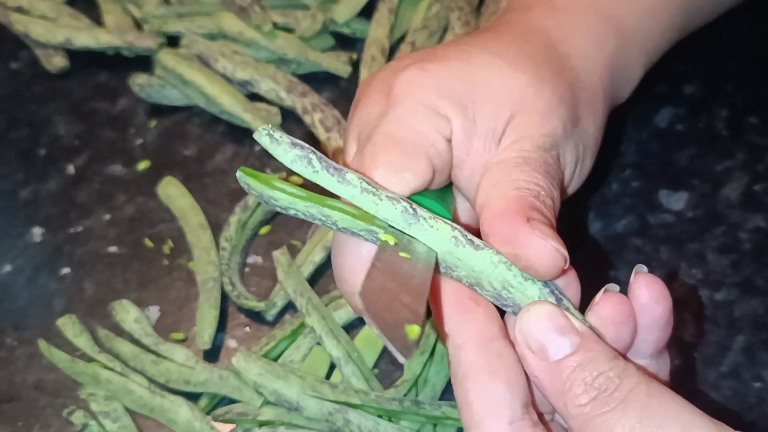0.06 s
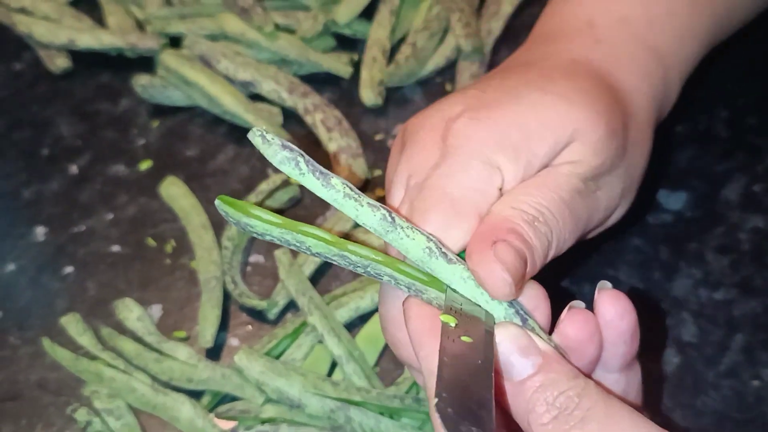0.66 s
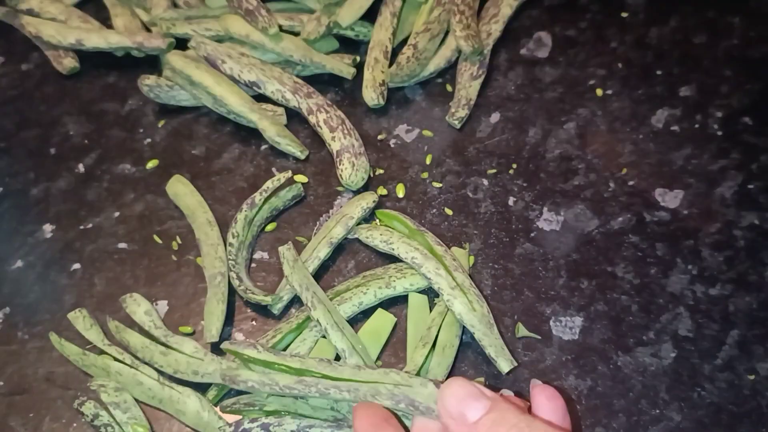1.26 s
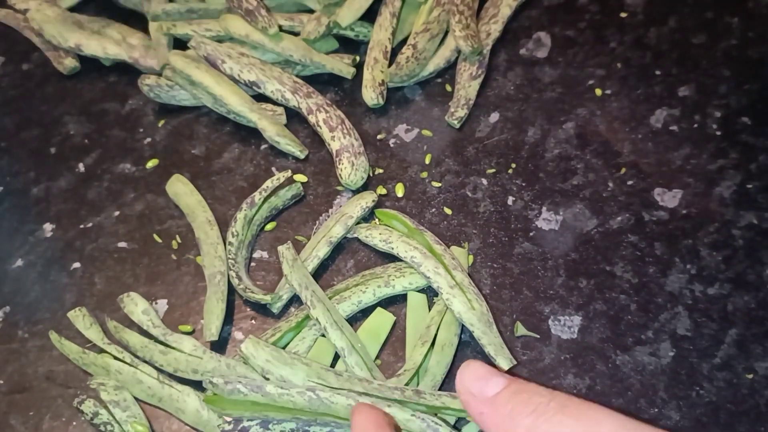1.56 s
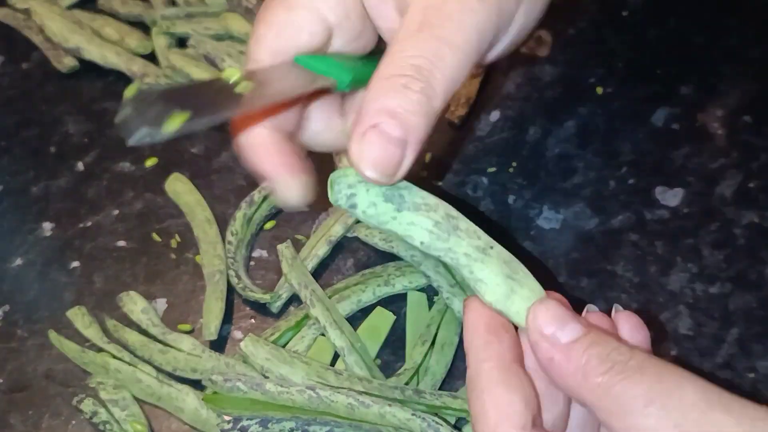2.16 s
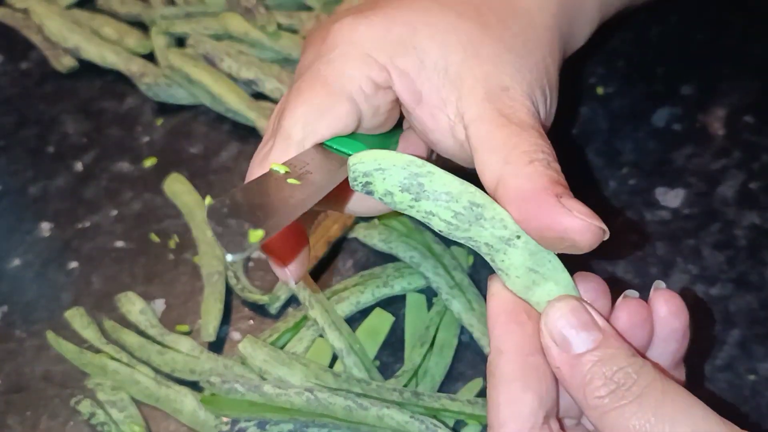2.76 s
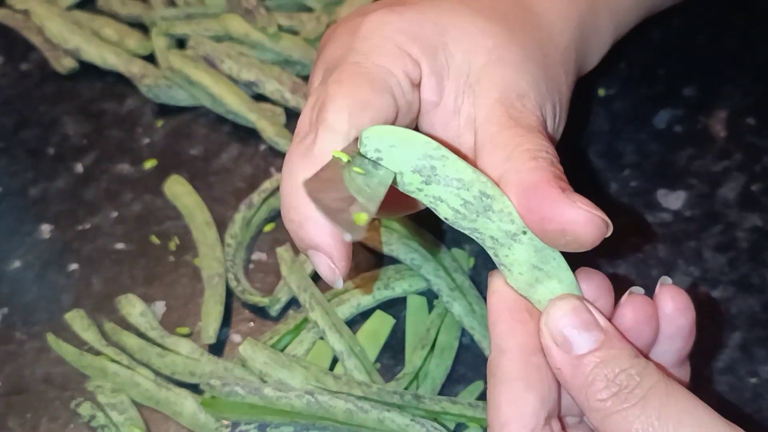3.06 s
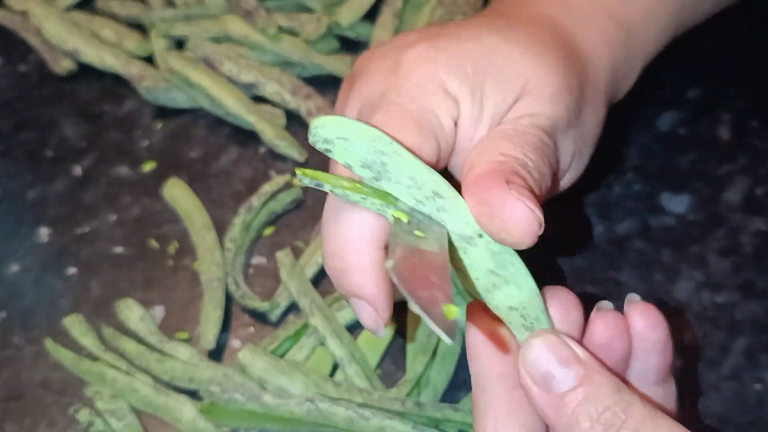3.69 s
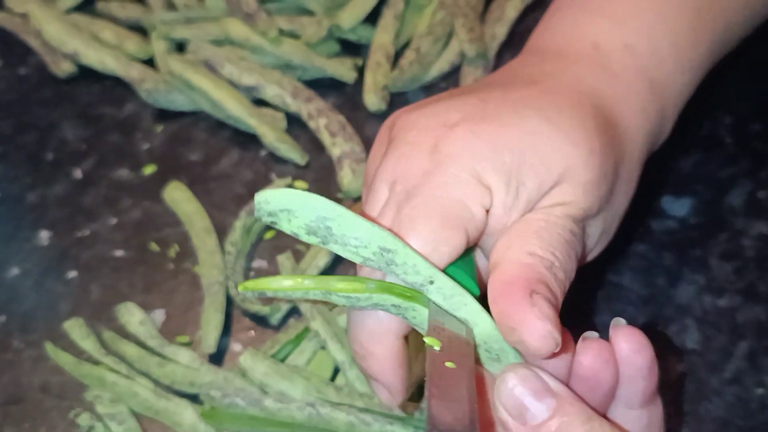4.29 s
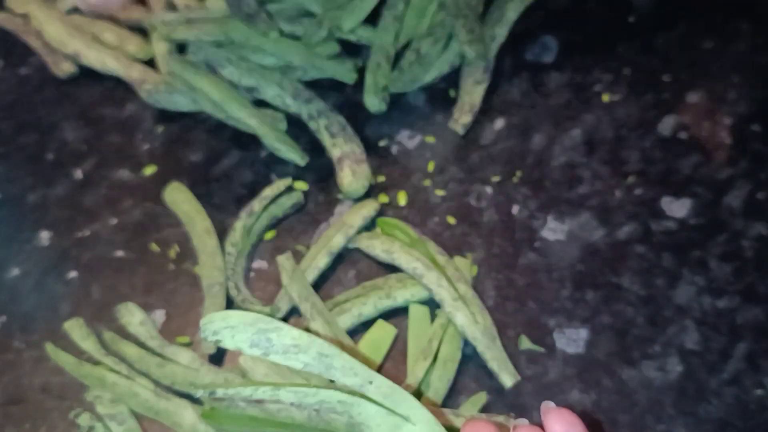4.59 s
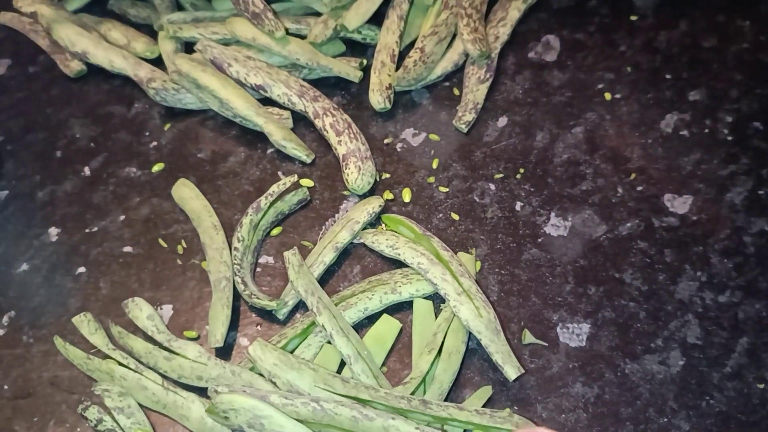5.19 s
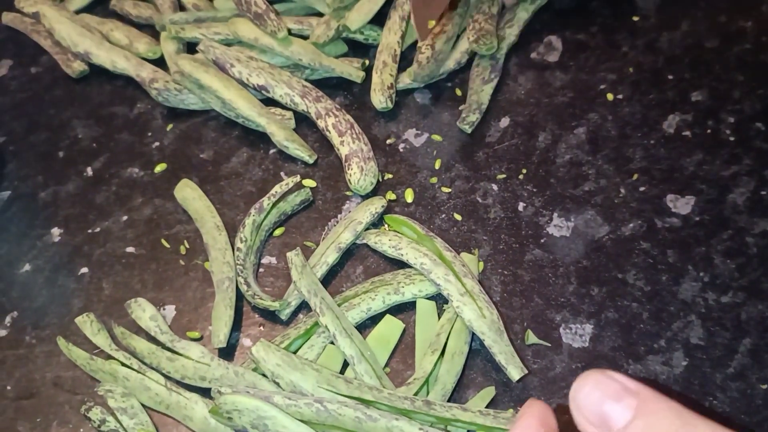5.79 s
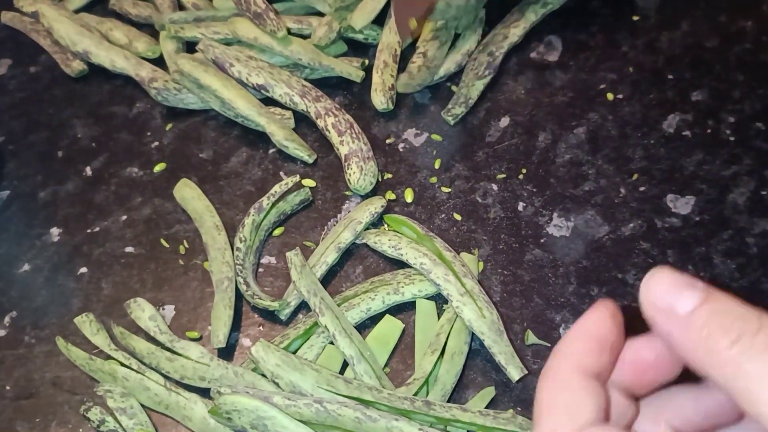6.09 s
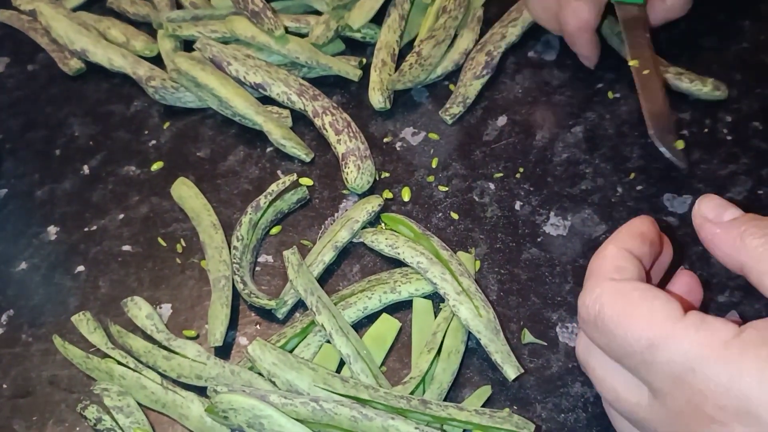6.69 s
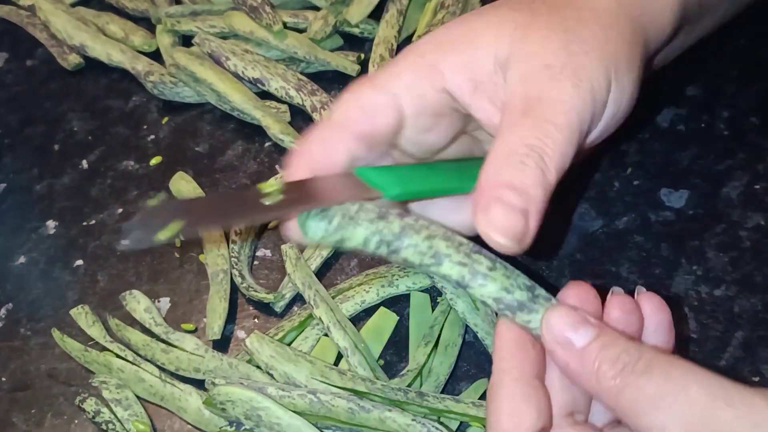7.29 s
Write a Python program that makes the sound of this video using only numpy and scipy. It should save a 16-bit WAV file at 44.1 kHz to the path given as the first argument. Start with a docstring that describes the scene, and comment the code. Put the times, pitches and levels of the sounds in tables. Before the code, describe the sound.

Close, crisp scraping and tiny snaps of a blade splitting bean pods, with faint finger rustling and dull knocks on a kitchen counter.

```python
"""Crisp rasps and snaps: a small knife slits two bean pods lengthwise, close to a phone over a stone counter.
The blade breaks a dense run of tiny fibres; tougher strings snap singly. Between cuts, fingers rustle
over the skins, and pods are shoved, laid down, dropped and picked up with dull knocks.
A quiet kitchen answers with short echoes over a low murmur and thin hiss."""
import sys
import numpy as np
from scipy import signal
from scipy.fft import rfft, irfft
from scipy.io import wavfile
from scipy.ndimage import uniform_filter1d

SR = 44100
rng = np.random.default_rng(int(sys.argv[2]) if len(sys.argv) > 2 else 0)


def bounce(signal):
    """Save signal as a 16-bit WAV file at the path given by the first command-line argument."""
    frames = np.transpose(np.atleast_2d(signal))
    limited = np.clip(frames, -1, 1)
    pcm = np.round(limited * 32767).astype(np.int16)
    wavfile.write(sys.argv[1], SR, pcm)


N = 328545
T = np.arange(N) / SR
TREBLE_HZ = 7800  # rasp below, fizz above


def undb(db):
    """Decibels to gain."""
    return 10 ** (np.asarray(db) / 20)


def unit(x):
    """Scale to rms 1."""
    return x / np.sqrt(np.mean(x ** 2))


def burst(x):
    """Scale the loudest 5 ms to rms 1."""
    return x / np.sqrt(uniform_filter1d(x ** 2, size=220).max())


def decay(t, t60_s):
    """Exponential fall, 60 dB in t60_s."""
    return np.exp(-np.log(1000) * t / t60_s)


def rise(t, rise_s):
    """Exponential onset towards 1."""
    return 1 - np.exp(-t / rise_s)


def butter(order, hz, kind):
    """Butterworth filter sections."""
    return signal.butter(order, hz, kind, fs=SR, output="sos")


def band(x, lo_hz, hi_hz=SR / 2 - 1):
    """Steep band-pass."""
    return signal.sosfilt(butter(4, [lo_hz, hi_hz], "band"), x)


def convolve(x, response):
    """Apply a response, keeping the length."""
    return signal.oaconvolve(np.atleast_2d(x), np.atleast_2d(response), axes=-1)[:, :x.shape[-1]]


def colour(x, points, power=1, size=4096):
    """Minimum-phase filter through (freq_hz, gain_db) points."""
    hz, db = np.transpose(points)
    log_hz = np.log(np.fft.rfftfreq(size, 1 / SR) + 1)
    gain = undb(power * np.interp(log_hz, np.log(hz), db))
    cepstrum = irfft(np.log(gain))[:size // 2]
    cepstrum[1:] *= 2
    response = irfft(np.exp(rfft(cepstrum, size)))[:size // 2]
    return convolve(x, response).reshape(x.shape)


def resonate(x, hz, cycles):
    """One resonance, falling 60 dB in the given cycles."""
    t = T[:SR // 20]
    return convolve(x, np.sin(2 * np.pi * hz * t) * decay(t, cycles / hz))


def add(track, start_s, sound):
    """Mix a sound in at start_s."""
    start = max(int(start_s * SR), 0)
    track[..., start:start + sound.shape[-1]] += sound[..., :N - start]


def flutter(rate_hz):
    """Smooth random wander, rms 1."""
    steps = rng.standard_normal(N // 40)
    return unit(np.interp(T * rate_hz, np.arange(len(steps)), steps))


def stroke(start_s, length_s, level_db, change_db, attack_s, release_s):
    """Gain of one hand movement: sets in, holds while the force drifts, dies away."""
    out, t = np.zeros(N), T[:int((length_s + 7 * release_s) * SR)]
    hold = undb(level_db + change_db * (np.minimum(t / length_s, 1) - .5))
    attack = np.minimum(t / attack_s, 1)
    release = np.exp(-np.maximum(t - length_s, 0) / release_s)
    add(out, start_s, hold * attack * release)
    return out


def impulses(rate_hz, spread_db, scatter):
    """Tiny random breaks or slips; spread_db makes a few strong, scatter varies them between ports."""
    size = undb(spread_db * np.minimum(rng.exponential(size=N), np.log(400)))
    occurs = rng.random(N) < rate_hz / SR
    return size * occurs * (rng.choice([-1, 1], N) + scatter * rng.standard_normal((2, N)))


def ports(pair, balance):
    """Two microphone ports, each with its own colour."""
    return np.array([colour(pair[0], balance, 1 / 2), colour(pair[1], balance, -1 / 2)])


def air(level_db=-63, waver_db=0.13, murmur_hz=900):
    """Low room murmur wavering under thin, steady hiss."""
    # still kitchen air: freq_hz, gain_db
    air_colour = [(15, -83), (25, -13.5), (113, 0.5), (179, -3.5), (211, -2), (333, -7), (425, -11.5),
                  (500, -11.5), (691, -15.5), (749, -17.5), (1590, -19), (1820, -18), (4100, -27),
                  (7630, -35.5), (10800, -36.5), (15800, -32.5)]
    # stereo width: freq_hz, side_over_mid_db
    width = [(60, -1.5), (110, -0.1), (200, -3), (380, -1.5), (700, -1), (1290, 0.7), (2380, -0.5),
             (4400, 0.52), (8120, -2.5), (15000, -25)]
    # air at the ports: freq_hz, left_over_right_db
    balance = [(60, 1.5), (110, 2.5), (200, 0), (380, 1.5), (700, 1), (1290, 0.5), (2380, -0.5),
               (4400, 0.5), (8120, -1), (15000, 2)]
    mid, side = colour(rng.standard_normal((2, N)), air_colour)
    side = colour(side, width)
    pair = ports(np.array([mid + side, mid - side]) / np.std(mid), balance)
    murmur = signal.sosfiltfilt(butter(2, murmur_hz, "low"), pair)
    waver = undb(waver_db * flutter(rate_hz=4))
    return (pair + murmur * (waver - 1)) * undb(level_db)


def kitchen(x, wet_db, echo_db, t60_s=0.3, build_s=0.0013):
    """Add near reflections and a short diffuse tail, its bass alike at both ports."""
    # nearby surfaces: delay_s, relative_db
    echoes = [(.0088, -26.5), (0.0153, -8.5), (.027, -24)]
    # diffuse tail: freq_hz, gain_db
    room_colour = [(60, -0.5), (250, -3.5), (700, -8.5), (1500, -3), (3000, -3.5), (6000, -9),
                   (15000, -11.5)]
    t = T[:SR // 2]
    mid, side = rng.standard_normal((2, len(t)))
    side = band(side, lo_hz=460)
    tail = colour(np.array([mid + side, mid - side]), room_colour) * decay(t, t60_s) * rise(t, build_s)
    response = undb(wet_db) * unit(tail) / np.sqrt(len(t))
    for delay_s, relative_db in echoes:
        response[:, int(delay_s * SR)] += undb(relative_db + echo_db)
    return x + convolve(x, response)


def fingers(judder_db=4, change_db=0.5):
    """Fingertips slide over the skins with a fine, faint rustle, brighter on some."""
    # slides: start_s, length_s, level_db, extra_treble_db
    rubs = [(0.59, 0.63, -73.5, -3), (1.2, 0.19, -64, 3), (1.452, 0.22, -64.5, 2.5),
            (1.688, 0.25, -78.5, 4), (2.098, 0.075, -69.5, 0), (2.48, 0.16, -76.5, -12),
            (4.348, 0.21, -70, -3), (4.824, 0.23, -66.5, 4), (5.292, 0.41, -73, 2), (5.762, 0.079, -64, 0),
            (5.885, 0.29, -68.5, 0), (6.1, 0.045, -64.5, 4), (6.267, 0.11, -71.5, 2.5),
            (6.665, 0.076, -61, 3), (6.782, 0.1, -67, -6), (6.925, 0.35, -79.5, -5), (7.19, .22, -69, -2)]
    # rubbed skin: freq_hz, gain_db
    skin_colour = [(530, -22), (900, 7), (1140, -25), (2130, 4.5), (2620, 9), (4760, -3), (6660, -3.5),
                   (11200, -9.5), (15100, -15), (15800, -12)]
    slips = impulses(rate_hz=5000, spread_db=0, scatter=0.91) * undb(judder_db * flutter(rate_hz=45))
    rustle = unit(colour(slips, skin_colour))
    treble = signal.sosfiltfilt(butter(2, TREBLE_HZ, "high"), rustle)
    out = np.zeros((2, N))
    for start_s, length_s, level_db, extra_treble_db in rubs:
        force = stroke(start_s, length_s, level_db, change_db, attack_s=0.0087, release_s=0.036)
        out += (rustle + treble * (undb(extra_treble_db) - 1)) * force
    return out


def shoves(judder_db=2):
    """A pushed pod sticks and slips on stone: a low, dull shuffle."""
    # pushes along the counter: start_s, length_s, level_db, change_db
    moves = [(1.597, 0.0423, -52.5, 21), (5.042, .035, -55, -12), (5.773, 0.036, -54, 4),
             (6.118, 0.092, -56.5, 4), (6.71, .045, -67, 3)]
    # pod sliding on stone: freq_hz, gain_db
    shove_colour = [(100, -32), (170, 7), (300, -1), (450, 1), (620, -12), (830, -3), (1100, -19.5),
                    (1600, -32), (3000, -33), (8000, -65)]
    slips = impulses(rate_hz=700, spread_db=3, scatter=0.16) * undb(judder_db * flutter(rate_hz=70))
    force = sum(stroke(*move, attack_s=0.004, release_s=0.0072) for move in moves)
    return unit(colour(slips, shove_colour)) * force


def modes(table, t, rise_s, freq_scale):
    """Decaying sines from a soft contact; a pod is too light to move the deep bass."""
    ring = sum(undb(db) * np.sin(2 * np.pi * freq * freq_scale * t) * decay(t, t60_s)
               for freq, t60_s, db in table)
    return burst(signal.sosfilt(butter(3, 90, "high"), ring * rise(t, rise_s)))


def blows(slap_t60_s=0.022, thud_lag_s=0.00082, detune=0.027):
    """Wet skin slaps, the pod knocks, the counter follows with a low thud."""
    # a blade jolt, then pods and knuckles on the counter: start_s, thud_db, knock_db, knock_hz, contact_s
    hits = [(0.2023, -70, -61.5, 1113, 0.00029), (1.48, -53, -56, 466, 0.0041),
            (1.551, -55, -59, 440, 0.0017), (1.623, -41, -47, 484, 0.0027), (1.634, -42, -51, 550, 0.00047),
            (4.857, -55.5, -58.5, 448, 0.0014), (5.043, -36.5, -58, 440, 0.00032),
            (5.326, -61, -63, 540, 0.004), (5.8, -43, -68, 477, 0.0013), (5.822, -45, -52, 440, 0.0019),
            (5.961, -60, -44, 680, 0.00051), (6.119, -52, -52.5, 473, .002),
            (6.2467, -21, -20, 687, 0.00066), (6.328, -33, -40, 546, 0.002),
            (6.383, -38.5, -49, 480, 0.0027), (6.669, -45.5, -50, 540, 0.0012),
            (6.689, -29.5, -35.5, 552, 0.00093), (6.744, -43, -41.5, 446, 0.0034),
            (6.834, -47.5, -38, 687, 0.00088), (6.88, -51, -45.5, 630, 0.0023),
            (7.319, -57.5, -52.5, 838, 0.00033)]
    # counter modes: freq_hz, t60_s, relative_db
    counter_modes = [(127, 0.087, -18.5), (182, 0.12, -15.5), (231, 0.13, -16.5), (269, 0.044, 4),
                     (270.7, 0.066, -26), (329, 0.038, -7)]
    # pod hitting stone: pitch_ratio, t60_s, relative_db
    pod_modes = [(.69, .04, 3), (.86, .03, -10.5), (1, .045, 11.5), (1.165, 0.023, 13.5), (1.35, 0.038, 2),
                 (1.56, 0.04, -24), (1.8, .014, -35)]
    # wet skin: freq_hz, gain_db
    slap_colour = [(600, -48), (1100, 9), (1600, 7), (2400, 3), (4000, -6.5), (6000, -18), (10000, -35),
                   (15000, -38)]
    usual_slap_db, usual_knock_db, usual_contact_s = -60.5, -48, .002
    out, t = np.zeros((2, N)), T[:SR // 3]
    loudest_db = max(hit[1] for hit in hits)
    for start_s, thud_db, knock_db, knock_hz, contact_s in hits:
        rise_s = max(contact_s, .0003)
        # hard, short contacts slap most
        softening_db = 4.6 * np.log2(rise_s / usual_contact_s)
        slap_db = usual_slap_db + 0.54 * (knock_db - usual_knock_db) - softening_db
        # light touches land on other pods and stray most in pitch
        stretch = 1 + detune * np.tanh((loudest_db - thud_db) / 15) * rng.standard_normal()
        slap = rng.standard_normal((2, len(t))) * decay(t, slap_t60_s) * rise(t, rise_s)
        add(out, start_s, undb(slap_db) * burst(colour(slap, slap_colour)))
        add(out, start_s, undb(knock_db) * modes(pod_modes, t, rise_s, knock_hz))
        add(out, start_s + thud_lag_s, undb(thud_db) * modes(counter_modes, t, 2 * rise_s, stretch))
    return out


def scrape(pushes, body, rate_hz, spread_db, ring_hz, ring_db):
    """Fibres break in uneven spurts and ring the pod; the finest fizz above the rasp."""
    judder_db, attack_s, release_s = 1.05, 0.003, 0.011
    breaks = impulses(rate_hz, spread_db, scatter=0.72) * undb(judder_db * flutter(rate_hz=160))
    crackle = colour(breaks, body)
    ring = undb(ring_db) * unit(resonate(breaks, ring_hz, cycles=30))
    dry_rasp = unit(band(crackle, lo_hz=2160, hi_hz=TREBLE_HZ))  # fibres are too small to sound lower
    rasp = unit(dry_rasp + ring)
    fizz = unit(band(crackle, lo_hz=TREBLE_HZ))
    out = np.zeros((2, N))
    for start_s, length_s, rasp_db, change_db, fizz_db in pushes:
        out += rasp * stroke(start_s, length_s, rasp_db, change_db, attack_s, release_s)
        out += fizz * stroke(start_s, length_s, fizz_db, change_db, attack_s, release_s)
    return out


def skid():
    """A pod skids on the pile with one brief rasp."""
    # the slip: start_s, length_s, rasp_db, change_db, fizz_db
    slip = [(5.263, 0.02, -48, -7.5, -57)]
    # pod on pod: freq_hz, gain_db
    skid_colour = [(710, -32), (1200, -28), (2840, -3), (3070, 8.5), (3380, -10), (3610, -5.5),
                   (6740, -16.5), (9120, -20), (9940, -1), (13400, -37), (15800, -19)]
    return scrape(slip, skid_colour, rate_hz=6600, spread_db=4.5, ring_hz=3070, ring_db=-2.5)


def snaps(ring_cycles=22, overtone_ratio=1.523, overtone_db=-7, crumble_db=-5, sudden_s=0.0048,
          lowest_hz=2250):
    """A tough string lets go: a crack, crumbling flesh and a brief two-mode ring of the pod."""
    # string snaps and light blade ticks: start_s, level_db, ring_hz, crumble_s
    strings = [(0.0218, -41, 8200, 0.0092), (0.0303, -51, 5240, 0.014), (0.0458, -40.5, 4900, 0.0081),
               (0.065, -53, 4830, 0.0078), (0.1066, -42.5, 5000, 0.0086), (0.119, -43, 4500, .012),
               (0.1517, -43, 4100, .009), (0.18, -57, 3760, 0.016), (0.259, -50, 4430, 0.0077),
               (0.203, -39.5, 7000, 0.0059), (0.229, -44, 5050, 0.012), (0.322, -46, 4430, 0.012),
               (0.3343, -44.5, 4130, .007), (0.354, -43.5, 4100, 0.014), (0.393, -42, 5270, 0.0098),
               (0.4038, -46, 5040, 0.0052), (0.7302, -55.5, 2560, 0.0056), (0.9446, -54.5, 2860, 0.018),
               (1.1981, -52, 4160, 0.0055), (1.633, -51.5, 3060, 0.015), (2.6011, -56.5, 2490, 0.066),
               (2.871, -43.5, 2590, 0.043), (2.935, -45, 2470, 0.065), (3.0407, -49, 2540, 0.045),
               (3.2187, -46, 5640, 0.0048), (3.319, -51, 6100, 0.025), (3.387, -48, 5000, 0.016),
               (3.421, -45.5, 4700, 0.018), (3.469, -48, 4960, 0.011), (3.506, -42, 4910, 0.021),
               (3.5553, -45, 4900, 0.005), (3.836, -57, 4800, 0.065), (3.8676, -55, 4900, 0.058),
               (3.8978, -53, 4850, 0.073), (3.9423, -46, 6500, .006), (3.9886, -43.5, 4960, .007),
               (4.17, -48, 8100, 0.0052), (4.2004, -43, 4040, 0.019), (4.35, -40.5, 7300, 0.0082),
               (4.44, -63, 9300, .012), (4.4597, -57.5, 2520, 0.015), (4.848, -52.5, 1870, 0.0057),
               (5.0383, -52, 6830, 0.0056), (6.6727, -51, 4670, 0.012), (7.3214, -46.5, 3080, 0.0097)]
    out, t = np.zeros((2, N)), T[:SR // 12]
    usual_s = np.median([row[3] for row in strings])
    for start_s, level_db, ring_hz, crumble_s in strings:
        envelope = decay(t, crumble_s) * rise(t, 0.039 * crumble_s)
        force = undb(crumble_db) * rng.standard_normal((2, len(t))) * envelope
        # a short snap cracks drily; a long tear gives way gradually and makes the pod sing
        force[:, 0] += min(sudden_s / crumble_s, 1)
        slowness = crumble_s / usual_s
        cycles = ring_cycles * slowness ** 0.22
        ring = unit(resonate(force, ring_hz, cycles))
        overtone = undb(overtone_db) * unit(resonate(force, overtone_ratio * ring_hz, cycles))
        crack = undb(-4 * np.log2(slowness)) * unit(resonate(force, ring_hz, cycles=3))
        snap = signal.sosfilt(butter(3, lowest_hz, "high"), ring + overtone + crack)
        add(out, start_s, undb(level_db) * burst(snap))
    return out


def cuts():
    """The blade pushes through the fibres; each part of the pods breaks and rings its own way."""
    # blade pushes: start_s, length_s, rasp_db, change_db, fizz_db, part
    pushes = [ (0.001, 0.013, -54.5, -8, -58, "first"), (0.028, 0.083, -51, -11.5, -60.5, "first"),
              (0.1, 0.11, -60.5, 0, -63, "first"), (0.195, 0.11, -58.5, -2.5, -59, "first"),
              (0.317, 0.076, -59.5, 9, -61, "first"), (0.404, .14, -64.5, -6.5, -64, "thumb"),
              (0.547, 0.043, -61, 0, -70.5, "thumb"), (2.929, .02, -57, -2, -59, "tip"),
              (2.96, 0.11, -56.5, 1.5, -69, "tip"), (3.137, .11, -57.5, -2, -71, "tip"),
              (3.273, 0.13, -58, -1.5, -67, "middle"), (3.415, 0.066, -53.5, 3.5, -63, "middle"),
              (3.495, 0.078, -52.5, -0.5, -59, "middle"), (3.648, 0.099, -72, -3, -71.5, "middle"),
              (3.826, .014, -70, 3, -69.5, "middle"), (3.884, 0.18, -52.5, -3, -57.5, "length"),
              (4.07, 0.15, -62, -6, -63.5, "thumb"), ]
    # rasp of the first pod: freq_hz, gain_db
    first = [(710, -38), (1200, 5), (1680, 4), (2150, -2), (3170, 2), (3450, -5), (3930, 6), (4470, -24),
             (4880, -15), (5320, -0.5), (5990, -18), (6960, -13), (8100, -28), (9020, -18.5), (15800, -37)]
    # rasp of the second pod's tip, middle and length: freq_hz, gain_db
    tip = [(1200, -6), (2000, 2.5), (2450, -11.5), (3100, -6.5), (3500, -17.5), (4300, -3.5), (5300, -11),
           (6200, -9.5), (7200, -23.5), (10000, -2), (15800, 3)]
    middle = [(1200, -12), (2000, 4.5), (2800, -1), (3700, -3), (4800, -28), (5500, -5), (6300, -7),
              (7500, -15.5), (10000, -12), (15800, -19.5)]
    length = [(710, -74), (1200, -30), (1430, 18), (1830, 0.5), (2670, 8), (3970, 4.5), (4520, -3.5),
              (4930, -6), (5550, -2.5), (6520, -3.5), (7840, -19), (10000, -9), (10900, -16), (15100, -22),
              (15800, -24)]
    # rasp of the stretch held at the thumb: freq_hz, gain_db
    thumb = [(1200, 3), (2500, 8), (3500, 1.5), (4500, 7), (5700, 3.5), (7000, 4), (7800, 3), (8500, 10.5),
             (9300, 7.5), (10700, 7), (11700, 2), (13000, 2), (15800, -8)]

    def through(part):
        """Pushes in one part."""
        return [push[:-1] for push in pushes if push[-1] == part]

    return (scrape(through("first"), first, rate_hz=3600, spread_db=2.5, ring_hz=4830, ring_db=-5)
            + scrape(through("tip"), tip, rate_hz=3000, spread_db=0, ring_hz=2420, ring_db=-5.5)
            + scrape(through("middle"), middle, rate_hz=3400, spread_db=2.8, ring_hz=4740, ring_db=1)
            + scrape(through("length"), length, rate_hz=6700, spread_db=1.5, ring_hz=4900, ring_db=-5.5)
            + scrape(through("thumb"), thumb, rate_hz=8100, spread_db=2, ring_hz=8430, ring_db=-15))


def scene(port_lag_s=.00014):
    """Hands close to the ports; the counter further off and more reverberant."""
    # hands and counter at the ports: freq_hz, left_over_right_db
    balance = [(200, 1), (700, -1), (1300, -1.5), (1950, -2.5), (2400, 1), (3000, -4), (4000, -10),
               (4900, -10.5), (6000, -9), (7200, -6.5), (9000, -12), (10800, 5.5), (12000, 4.5),
               (15000, 16.5)]
    hands = kitchen(cuts() + skid() + snaps() + fingers(), wet_db=-14, echo_db=-15)
    counter = kitchen(blows() + shoves(), wet_db=-6, echo_db=-4)
    left, right = ports(hands + counter, balance)
    return np.array([left, np.roll(right, int(port_lag_s * SR))]) + air()


def record(dry):
    """The phone cuts the top treble steeply."""
    top_hz = 15850
    return signal.sosfilt(signal.ellip(10, .2, 70, top_hz, fs=SR, output="sos"), dry)


dry = scene()
out = record(dry)
bounce(out)
```